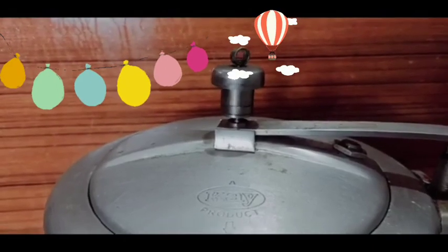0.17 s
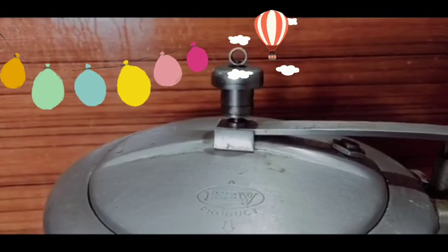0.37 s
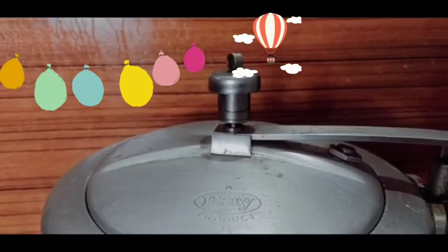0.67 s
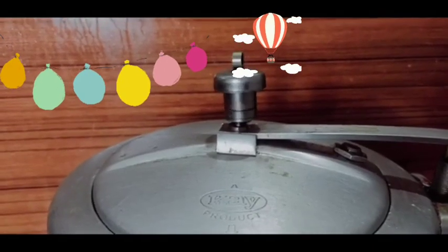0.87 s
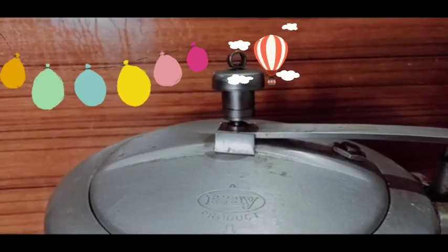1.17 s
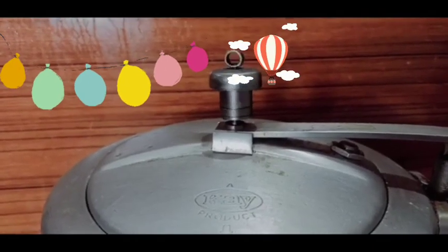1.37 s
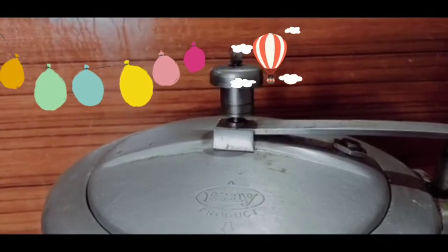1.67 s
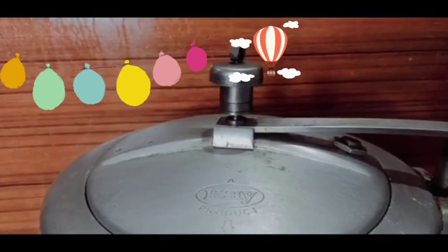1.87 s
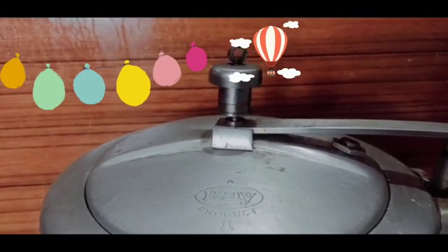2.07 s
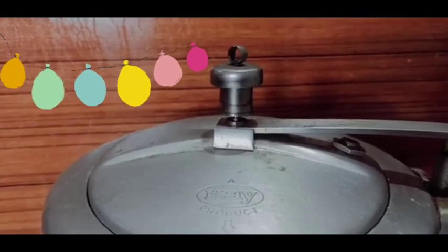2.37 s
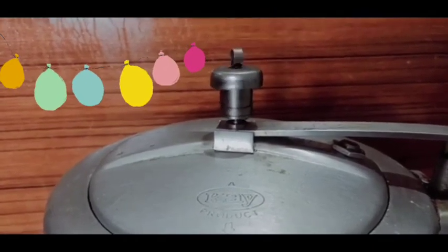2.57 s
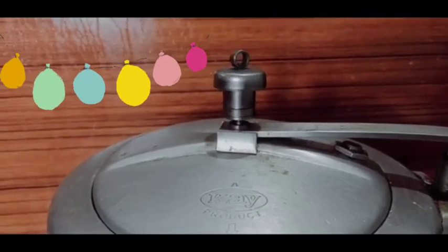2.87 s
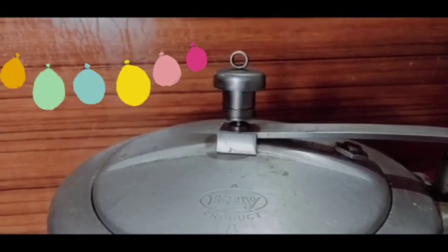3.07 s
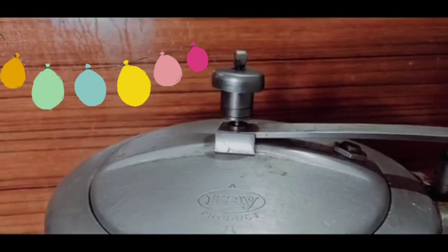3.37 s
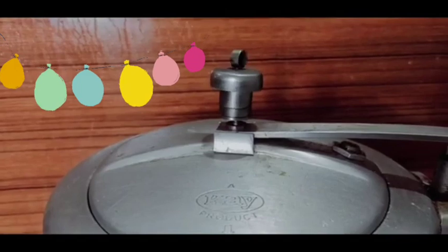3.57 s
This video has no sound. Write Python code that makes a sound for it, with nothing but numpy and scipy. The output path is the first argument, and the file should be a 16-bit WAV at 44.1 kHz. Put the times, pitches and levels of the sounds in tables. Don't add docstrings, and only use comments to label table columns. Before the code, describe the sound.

A pressure cooker's loud, airy hiss flutters about fourteen times a second from the start, grows slightly stronger midway and surges near the end, over very quiet burner rumble and room hum, heard close with short tile reflections.

```python
import sys
import numpy as np
from scipy import signal
from scipy.fft import rfft, irfft, next_fast_len
from scipy.io import wavfile
from scipy.ndimage import uniform_filter1d, map_coordinates

SR = 44100
rng = np.random.default_rng(int(sys.argv[2]) if len(sys.argv) > 2 else 0)


def inscribe(sig):
    pcm = np.round(np.clip(np.atleast_2d(sig).T, -1, 1) * 32767)
    wavfile.write(sys.argv[1], SR, pcm.astype(np.int16))


def magnitude_from_level(level_db):
    exponent = np.asarray(level_db, float) / 20
    return 10 ** exponent


N = 164052
T = np.arange(N) / SR


def unit(x):
    return x / np.sqrt(np.mean(x ** 2) + 1e-20)


def along(points, hz):
    point_hz, value = np.transpose(points)
    return np.interp(np.log(hz + 1), np.log(point_hz + 1), value)


def wobble(rate):
    return map_coordinates(rng.standard_normal(3000), [T * rate])


def filtered(x, response):
    size = next_fast_len(N + SR // 2)
    spectrum = rfft(x, size) * response(np.fft.rfftfreq(size, 1 / SR))
    return irfft(spectrum, size)[..., :N]


def bell(x, centre, width):
    return 2.0 ** (-(2 * (x - centre) / width) ** 2)


def swells(table):
    return sum(db * bell(T, s, length) for s, length, db in table)


def narrow_noise(hz, width_hz):
    return unit(filtered(rng.standard_normal(N), lambda f: bell(f, hz, width_hz)))


# (frequency [Hz], width [Hz], boost [dB])
CAVITIES = [(1580, 240, -4.5), (1940, 87, -4), (527, 26, 0.5), (3480, 120, 4), (3720, 340, -4),
            (6280, 310, 2.5), (6850, 74, 4.5), (8900, 150, 3), (9340, 130, 0.5), (9690, 490, 9),
            (10200, 320, 3), (10580, 420, 10), (12630, 440, 4)]


def rush(spectrum, patchy_db, top_hz=20000):
    z = signal.stft(rng.standard_normal(N + 512), nperseg=512)[2]
    patches = uniform_filter1d(rng.standard_normal(z.shape), size=6, axis=0)
    patches = unit(uniform_filter1d(patches, size=6, axis=1))
    x = signal.istft(z * magnitude_from_level(patchy_db * patches), nperseg=512)[1][:N]

    def colour(f):
        cavities_db = sum(db * bell(f, hz, width) for hz, width, db in CAVITIES)
        return magnitude_from_level(along(spectrum, f) + cavities_db) / (1 + (f / top_hz) ** 16)

    return unit(filtered(x, colour))


# (frequency [Hz], level per Hz [dB])
BURNER = [(12, -27), (20, 0), (43, -4), (92, 7), (183, 7.5), (244, 5.5), (450, -15.5), (580, -41),
          (990, -120)]


def burner():
    return magnitude_from_level(-64.5) * rush(BURNER, patchy_db=2.2)


# (frequency [Hz], width [Hz], level [dB])
HUM = [(80, 14, -77.5), (122, 10, -73), (200, 31, -71.5), (368, 21, -71)]
# (time [s], length [s], level [dB])
DRONE_SWELLS = [
    (0.154, 0.22, 12.5),
    (.53, 0.092, 10),
    (0.996, 0.68, 8.5),
    (1.6, 0.29, 9.5),
    (3.075, 0.11, 12),
    (3.5, 0.32, 6),
]


def kitchen_hum():
    lines = sum(magnitude_from_level(db) * narrow_noise(hz, width) for hz, width, db in HUM)
    drone_hz, drone_db = 183.4, -70
    level = magnitude_from_level(drone_db + swells(DRONE_SWELLS) + 2.6 * wobble(19))
    return lines + level * np.sin(2 * np.pi * drone_hz * T + 0.9 * wobble(9))


# (time [s], length [s], frequency [Hz], level [dB])
LID_RING = (2.46, .15, 520, -54)


def lid_ring():
    start, length, hz, db = LID_RING
    tone = np.sin(2 * np.pi * hz * T + 0.5 * wobble(29))
    return magnitude_from_level(db) * bell(T, start + length / 2, length) * tone


def walls(x):
    level_db, t60_s = -12, 0.3
    t = np.arange(SR // 5) / SR
    tail = rng.standard_normal(len(t)) * magnitude_from_level(-60 * t / t60_s)
    tail = tail / np.linalg.norm(tail)
    return x + magnitude_from_level(level_db) * signal.fftconvolve(x, tail)[:N]


# (time [s], length [s], level [dB])
WHISTLE_SWELLS = [
    (.87, 0.1, 10),
    (1.125, 0.15, 7),
    (3.43, 0.12, 0),
]


def whistle():
    level_db = -58 + swells(WHISTLE_SWELLS) + 2.1 * wobble(9)
    return magnitude_from_level(level_db) * narrow_noise(3540, 180)


# (time [s], rocks ahead of a steady rate [cycles], swing [dB])
ROCKING = [(0, 0.62, 1.5), (.15, 0.77, 2), (.39, 1.15, 3), (.46, 0.97, 2.5), (.65, 1, -0.5), (.8, 1.3, 1.5),
           (.92, 1.22, 3), (1.05, 1.39, 3), (1.4, 1.76, 1.5), (1.55, 1.7, 1.5), (1.68, 1.6, 0.7),
           (1.76, 2.04, 1.5), (2, 2.14, 1.5), (2.1, 1.97, 2.5), (2.24, 1.9, 1.4), (2.45, 1.49, 1.5),
           (2.62, 1.52, 2.5), (2.8, 1.2, 0)]


def rocking():
    rocks_per_s = 14
    s, ahead, swing_db = np.transpose(ROCKING)
    cycles = rocks_per_s * T + np.interp(T, s, ahead)
    return np.interp(T, s, swing_db) * np.cos(2 * np.pi * cycles)


# (time [s], level [dB])
PRESSURE = [
    (0, 0),
    (.6, 0.5),
    (1.2, 0.5),
    (1.9, 0.5),
    (2.6, 1.5),
    (3.2, 1.5),
    (3.45, 1.5),
    (3.72, 1.1),
]
# (time [s], gain [dB], length [s], extra roar [dB], extra fizz [dB])
SURGES = [(0.14, 0, 0.054, -0.5, 4.5), (0.403, 1.7, 0.039, -1.5, 0.3), (0.454, 1, 0.028, -.6, 4),
          (.565, 0, .03, 2, 4), (0.652, 0.6, 0.068, -0.5, 1.5), (.84, 2.5, 0.065, -0.5, -1),
          (1.06, 2.5, 0.03, -2, -0.8), (1.16, 3.5, 0.054, -3, -4), (1.384, 1.5, 0.046, -1.5, -1),
          (1.51, 2, 0.034, 0, 1), (1.657, 3.5, 0.07, -1.5, -2.5), (1.782, 4, 0.065, -1, -2.3),
          (1.935, 2.2, 0.046, 1, -2), (2.034, 1.3, 0.12, -2, 1.3), (2.286, 2, 0.058, 0, 2),
          (2.714, 5, 0.044, -1.8, -2), (2.57, 0.5, 0.09, -1, 1.1), (3.008, 1.5, 0.029, -1.7, 2.5),
          (3.378, 5.5, 0.062, 0, -0.3), (3.415, -2.5, 0.026, 0, -5), (3.506, 0.5, 0.13, 1.5, 2.8),
          (3.557, -1, 0.023, -1, 2), (3.632, 2.5, 0.067, 3.3, 2.5), (3.682, 3, 0.056, 4.5, 2)]
# (frequency [Hz], level per Hz [dB])
ROAR = [(150, -42), (280, -13), (500, -7), (800, -9), (1330, -6), (2050, -8), (2250, -5), (4400, -0.5)]
CORE = [(3800, -41.5), (4400, -20), (4640, -11), (4970, -13.5), (5450, -4), (6500, -1.5), (7600, -12),
        (8600, -13)]
FIZZ = [(7800, -43), (8500, -10.5), (11000, -7.5), (11700, 2), (13300, -1.5), (14200, -5), (14950, -10),
        (15100, -40)]
# (rocking [dB/dB], surges and pressure [dB/dB], flutter [dB/dB])
FOLLOW = [(.45, 0.94, 0.65), (.45, 0.92, 1.06), (1.3, 1, 0.53)]


def jet():
    rock_db = rocking()
    tips = [(bell(T, s, length), db, roar, fizz) for s, db, length, roar, fizz in SURGES]
    pressure_db = np.interp(T, *np.transpose(PRESSURE))
    flow_db = pressure_db + sum(db * tip for tip, db, _, _ in tips)
    flutter_db = 0.27 * wobble(29.64) + 0.68 * wobble(350)
    roar_gain, core_gain, fizz_gain = [
        magnitude_from_level(rock * rock_db + flow * flow_db + flutter * flutter_db) for rock, flow, flutter in FOLLOW]

    roar_db = -44.5 + sum(db * tip for tip, _, db, _ in tips) + 0.44 * wobble(16)
    core_db = -30.12 + 0.33 * wobble(21.9)
    fizz_db = -32.66 + sum(db * tip for tip, _, _, db in tips) + 0.5 * wobble(27.67)
    roar = magnitude_from_level(roar_db) * rush(ROAR, patchy_db=1.73, top_hz=4460) + whistle()
    core = magnitude_from_level(core_db) * rush(CORE, patchy_db=0.78, top_hz=9360)
    fizz = magnitude_from_level(fizz_db) * rush(FIZZ, patchy_db=1.4)
    return roar_gain * roar + core_gain * core + fizz_gain * fizz


def scene():
    background = burner() + kitchen_hum() + lid_ring()
    mono = background + magnitude_from_level(-0.82) * walls(jet())
    return np.array([mono, mono])


# (time [s], low edge [Hz], high edge [Hz])
APART = [
    (.572, 6115, 9044),
    (1.733, 11542, 13867),
    (2.012, 7494, 8958),
    (2.012, 12920, 15100),
    (2.384, 10853, 12489),
    (2.384, 13695, 15100),
    (2.756, 11542, 13178),
    (2.941, 4565, 5771),
]


def ear_difference(mono):
    length_s, level_db = 0.04, -2.5
    side = 0
    for s, low, high in APART:
        band = lambda f: (f > low) & (f < high)
        phase = np.clip((T - s) / length_s + 0.5, 0, 1)
        window = np.sin(np.pi / 2 * np.sin(np.pi * phase) ** 2)
        heard = window * filtered(mono, band)
        level = np.sqrt(np.sum(heard ** 2) / np.sum(window ** 2))
        side = side + magnitude_from_level(level_db) * level * window * unit(filtered(rng.standard_normal(N), band))
    return np.array([side, -side])


def band_limit(x):
    return signal.sosfilt(signal.butter(12, 15710, fs=SR, output="sos"), x)


def record(dry):
    mix = filtered(dry, lambda f: f < 15030) + ear_difference(dry[0])
    return band_limit(mix)


dry = scene()
out = record(dry)
inscribe(out)
```